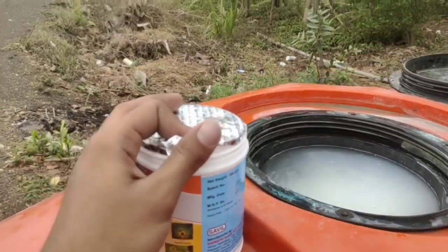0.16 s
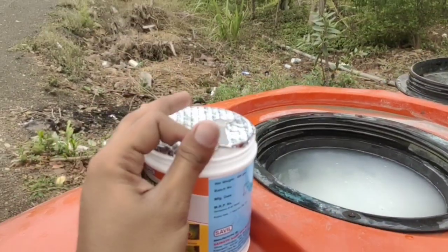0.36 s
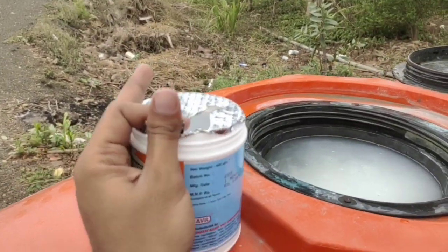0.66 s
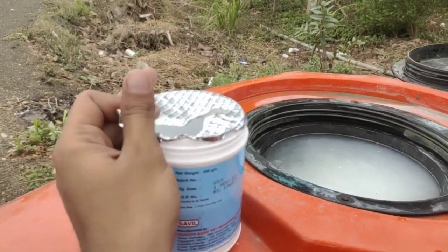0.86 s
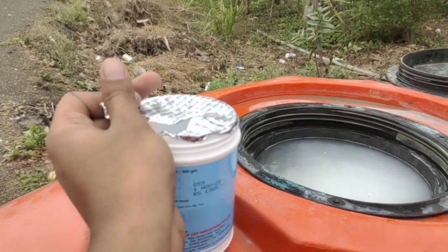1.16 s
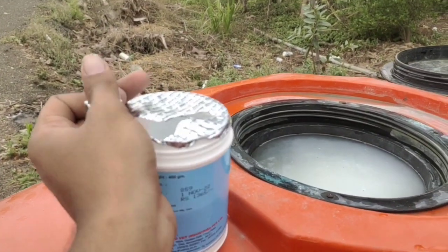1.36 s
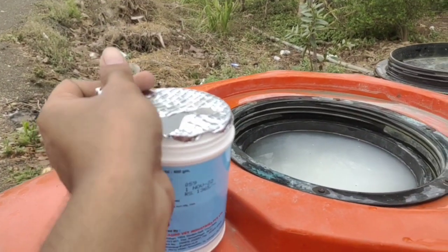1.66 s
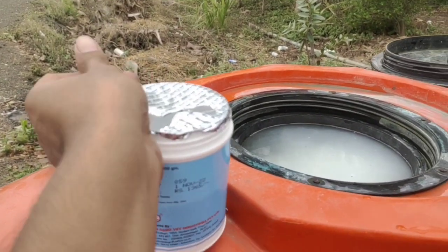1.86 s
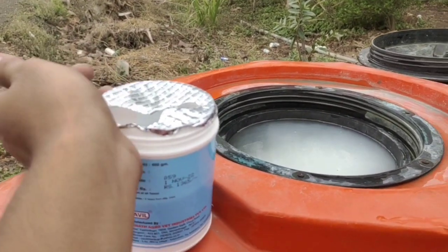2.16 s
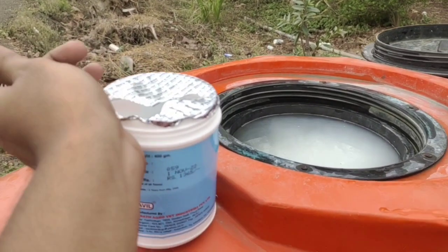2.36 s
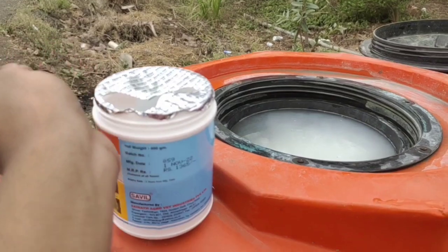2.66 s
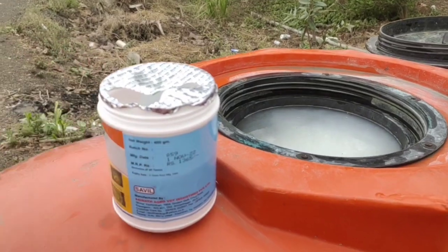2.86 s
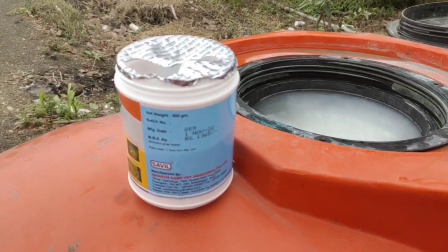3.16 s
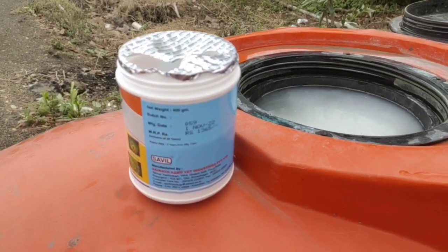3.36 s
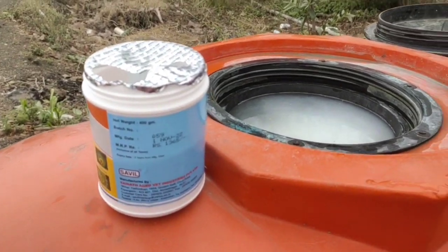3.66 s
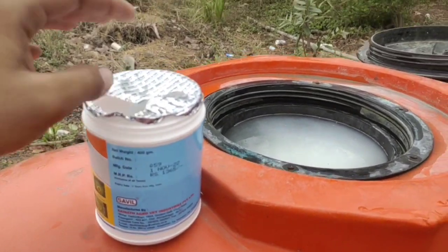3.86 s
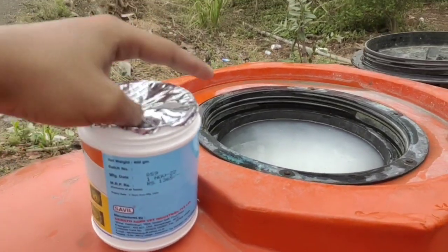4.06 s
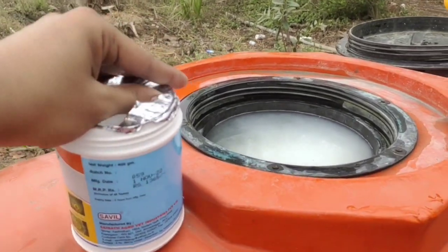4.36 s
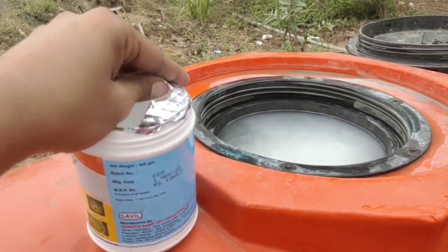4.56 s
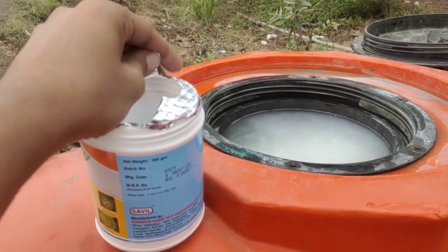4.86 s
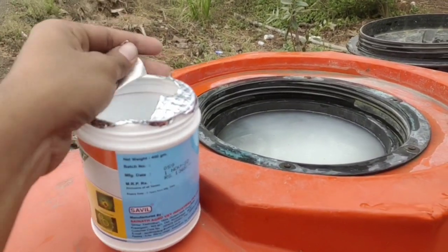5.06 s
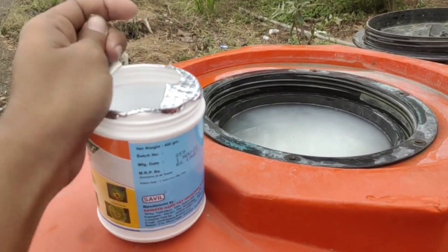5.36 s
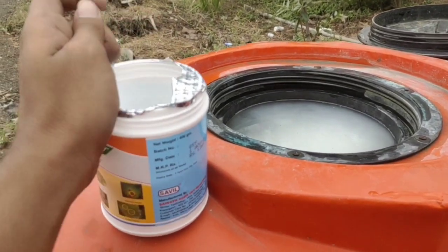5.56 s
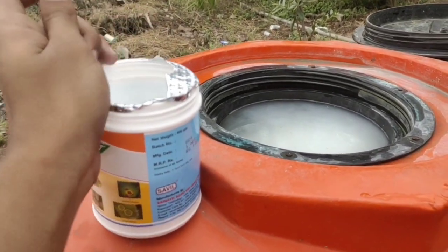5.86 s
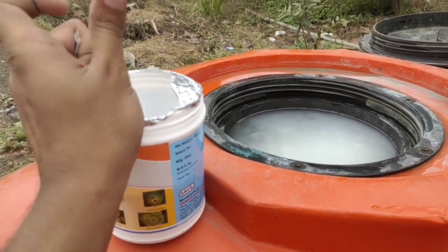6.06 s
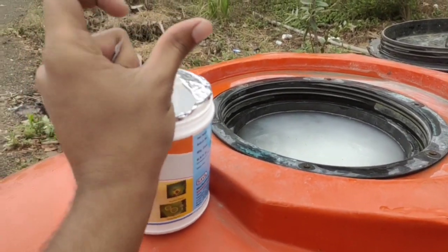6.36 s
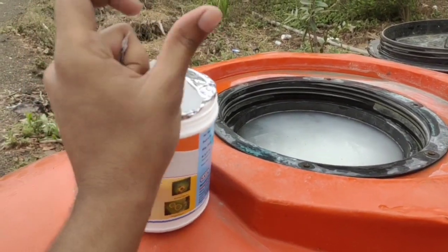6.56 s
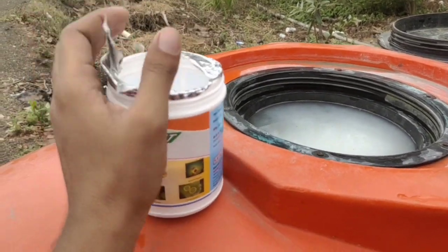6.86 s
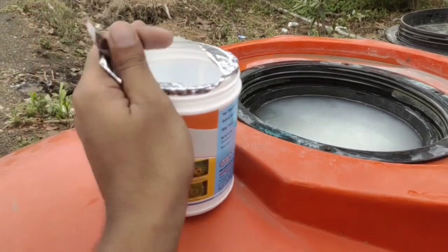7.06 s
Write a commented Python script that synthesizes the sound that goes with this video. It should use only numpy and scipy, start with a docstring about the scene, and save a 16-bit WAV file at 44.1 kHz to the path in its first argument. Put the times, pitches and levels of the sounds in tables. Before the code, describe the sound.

Fingers pick and snap the foil seal on a plastic jar outdoors, a loose cap clatters briefly, and a small bird repeats quick whistles.

```python
"""Outdoors, close to a plastic jar on a hollow plastic tank: fingers rub and pick at its foil seal from
the start. Foil snaps are struck rings with crackle, rips are runs of clicks, and bumps ring the tank's low modes.
A small bird soon repeats two falling whistles and a rough high note; other birds call farther off.
Halfway a loose cap clatters in a burst of ringing modes; then bird and picking go on, with a hard snap
and late rips. Shaped noise makes a faint hiss, the breeze's rumble and the open air throughout."""
import sys
import numpy as np
from scipy import signal
from scipy.fft import rfft, irfft, next_fast_len
from scipy.io import wavfile

SR = 44100
rng = np.random.default_rng(int(sys.argv[2]) if len(sys.argv) > 2 else 0)


def transcribe(u):
    """Save the signal u as a 16-bit wav file named by the first command-line argument.

    u: samples, shape (n,) or (channels, n), limited to [-1, 1]; the rate is SR.
    q: integer samples, one column per channel.
    """
    v = np.clip(np.atleast_2d(u).T, -1, 1)
    q = np.round(v * 32767).astype(np.int16)
    wavfile.write(sys.argv[1], SR, q)


N = 317961

# low modes of the hollow tank: (frequency [Hz], relative level [dB], t60 of the rubbed hum [s])
TANK_MODES = [(127, 4.5, 0.15), (251.8, 5.5, 1), (532, -3.5, 0.13)]
JAR_LAG_S, BIRD_LAG_S = 9 / 44100, 35 / 44100   # how much later the left port hears them


def amp(db):
    """dB to gain."""
    return 10 ** (np.asarray(db) / 20)


def rms_one(x):
    """Scale to rms 1."""
    return x / np.sqrt(np.mean(x ** 2) + 1e-20)


def in_time(rows):
    """Columns of a curve table, one value per sample."""
    s, *columns = np.transpose(rows)
    return [np.interp(np.arange(N) / SR, s, c) for c in columns]


def drift(rate):
    """A wandering curve: random knots of spread 1, `rate` of them per second, joined by lines."""
    knots = rng.standard_normal(int(N / SR * 60) + 2)
    return np.interp(np.arange(N) / SR * rate, np.arange(len(knots)), knots)


def band(x, low_hz, high_hz):
    """Butterworth band-pass."""
    return signal.sosfilt(signal.butter(2, [low_hz, high_hz], "band", fs=SR, output="sos"), x)


def coloured(x, spectrum):
    """Filter x by a curve in dB over log frequency; rms 1."""
    size = next_fast_len(N)
    hz, db = np.transpose(spectrum)
    bins_hz = np.arange(size // 2 + 1) * SR / size
    gain = amp(np.interp(np.log(bins_hz + 1), np.log(hz), db, left=-80, right=-80))
    return rms_one(irfft(rfft(x, size) * gain, size)[..., :N])


def ring(push, hz, t60):
    """A resonator: a unit click sets a dying sine of starting height 1 ringing."""
    r, w = amp(-60 / (t60 * SR)), 2 * np.pi * hz / SR
    return signal.lfilter([0, np.sin(w)], [1, -2 * r * np.cos(w), r * r], push + 1e-18)


def add(out, s, sound, pan_db=0):
    """Mix a short sound (one or two channels) in at time s; positive pan leans left."""
    i = max(round(s * SR), 0)
    panned = sound * amp([[pan_db / 2], [-pan_db / 2]])
    out[:, i:i + sound.shape[-1]] += panned[:, :N - i]


def at_ports(x, lag_s):
    """The left microphone port hears the sound later than the right."""
    lag = round(lag_s * SR)
    return np.stack([np.r_[np.zeros(lag), x[0, :N - lag]], x[1]])


def grains(per_s, spread_db, alike):
    """Two channels of random clicks of uneven size, partly shared between the channels."""
    sizes = amp(spread_db * np.minimum(rng.exponential(1, (3, N)), 5)) * rng.choice([-1, 1], (3, N))
    clicks = rms_one(sizes * (rng.random((3, N)) < per_s / SR))
    return np.sqrt(alike) * clicks[0] + np.sqrt(1 - alike) * clicks[1:]


def crack(noise, t60, low_hz, high_hz=16000):
    """A burst of band-passed noise that rises in a moment and dies fast."""
    rise_s = 0.0012
    age = np.arange(noise.shape[-1]) / SR
    return rms_one(band(noise, low_hz, high_hz)) * amp(-60 * age / t60) * np.minimum(age / rise_s, 1)


def patchy(x, low_hz, depth_db):
    """Split into half octaves that each flicker quickly on their own."""
    edges = low_hz * 2 ** np.arange(0, 4.1, .5)
    return sum(band(x, .92 * low, 1.08 * high) * amp(depth_db * drift(55))
               for low, high in zip(edges, edges[1:]))


def jar_mouth(x):
    """The open jar lifts a few broad resonances out of any foil sound."""
    # resonances of the mouth: (frequency [Hz], width [Hz], level [dB])
    resonances = [(2450, 380, 13), (4050, 500, 8), (5750, 700, 7)]
    out = x
    for hz, width, db in resonances:
        r = np.exp(-np.pi * width / SR)
        poles = [2, -4 * r * np.cos(2 * np.pi * hz / SR), 2 * r * r]
        out = out + amp(db) * signal.lfilter([1 - r * r, 0, r * r - 1], poles, x)
    return out


def whistle(length, from_hz, to_hz, rough):
    """A gliding near-sine with a soft start and end; roughness is quick level flutter."""
    share = np.arange(round(length * SR)) / (length * SR)
    tone = np.sin(2 * np.pi * np.cumsum(from_hz + (to_hz - from_hz) * share ** 0.72) / SR)
    flutter = np.interp(share * length * 400, np.arange(100), rng.standard_normal(100))
    return tone * (1 + rough * flutter) * np.sin(np.pi * share) ** 0.19


def scrub_echo(x, t60):
    """Diffuse echo from the bushes, unrelated in the two channels: convolution with dying noise."""
    age = np.arange(SR // 2) / SR
    echo = rng.standard_normal((2, len(age))) * amp(-60 * age / t60) * np.minimum(age / 0.011, 1)
    return signal.fftconvolve(x.mean(0)[None], echo, axes=1)[:, :N]


def snaps():
    """Each dimple flips: a ragged push rings its own pitch and thuds around it, creases crackle on top."""
    # foil dimples popping: (time [s], ring peak [dB], ring pitch [Hz], cycles rung to -60 dB,
    # relative mid crackle level [dB], relative bright crack level [dB])
    dimples = [(0.148, -52, 890, 18, -32.5, -34), (0.179, -34.5, 5500, 20, -33, -48),
               (0.414, -67, 1960, 42, -57, -46.5), (0.538, -52.5, 840, 10, -68, -72),
               (0.799, -56, 894, 20, -35.5, -40.5), (0.81, -41.5, 850, 20, -23.5, -25.5),
               (0.896, -45, 2030, 44, -53, -60), (1.034, -54.5, 670, 28, -70, -77),
               (1.463, -43, 603, 8.2, -42, -56), (1.754, -48.5, 2400, 24, -39.5, -85),
               (1.814, -37.5, 912, 51, -36.5, -48), (1.8306, -28.5, 1250, 60, -25.5, -40),
               (2.793, -43, 2480, 47, -35, -47), (3.008, -67, 5500, 35, -64, -57),
               (3.073, -78, 583, 17, -55, -58.5), (4.28, -23, 890, 21.7, -28.5, -59),
               (4.462, -33, 850, 7, -55, -70), (4.505, -50, 412, 17, -43, -62),
               (4.614, -52.5, 683, 16, -73, -80), (4.733, -35, 2440, 64, -37, -69),
               (4.743, -45.5, 587, 4, -62, -78), (4.754, -53, 590, 6.7, -50, -75),
               (4.8226, -17, 934, 5.6, -13, -20.5), (5.263, -41.5, 2690, 42, -35.5, -78),
               (5.629, -40, 2530, 29, -29, -60.5), (5.637, -33, 2500, 22, -37, -59),
               (5.802, -74, 2140, 34, -35.5, -48.5), (5.864, -79, 3300, 30, -33.5, -40),
               (5.878, -59, 2550, 30, -35.5, -49), (5.975, -49, 2050, 44, -37, -58),
               (6.09, -43, 1970, 47, -75, -83), (6.159, -29.5, 3150, 7.7, -49, -74),
               (6.189, -46, 2480, 30, -40, -45), (6.306, -40, 1960, 43, -67, -86),
               (6.668, -49, 2340, 30, -55, -73), (6.703, -45, 2400, 27, -37.5, -58),
               (6.755, -73, 2400, 24, -38.5, -58), (6.779, -47, 2400, 30, -33, -60),
               (6.796, -35, 2540, 17, -18, -26.5), (6.857, -39.5, 2450, 27, -36, -66),
               (6.929, -38.5, 2300, 60, -55, -38)]
    thud_t60, crackle_t60 = 1.26 * 0.043, .016   # [s]
    thud_db, thud_db_per_octave = -9.5, -7   # thud against ring at 800 Hz; low dimples thud more
    out, size = np.zeros((2, N)), 4000
    age = np.arange(size) / SR
    unevenness = amp(2.28 * rng.exponential(1, (len(dimples), 1, size)))
    noise = rng.standard_normal((len(dimples), 3, size)) * unevenness
    noise[:, 0, 20] = 3.9     # the flip itself is one sharp click
    for (s, ring_db, hz, cycles, mid_db, bright_db), n in zip(dimples, noise):
        both, octaves = n[0] + 0.49 * n[1:], np.log2(hz / 800)
        t60 = cycles / hz
        push = n[0] * amp(-60 * age / (.2 * t60))
        tone = band(ring(push, hz, t60), .6 * hz, 1.8 * hz)
        tone = tone * np.minimum(age / (3 / hz), 1)   # builds over three cycles
        thud = crack(n[0] + 6.2 * n[1:], thud_t60, low_hz=0.22 * hz, high_hz=2.07 * hz)
        thud = amp(thud_db + thud_db_per_octave * octaves) * thud
        add(out, s, amp(ring_db) * (tone / np.abs(tone).max() + thud), pan_db=9.3 * octaves)
        # a short crackle with a longer, weaker tail, its channels swapped
        mid, bright = (crack(both, crackle_t60 / 2, *edges)
                       + amp(-8.5) * crack(both[::-1], 1.52 * crackle_t60, *edges)
                       for edges in [(1900, 4880), (6700, 15400)])
        add(out, s, amp(mid_db - 13) * jar_mouth(mid), pan_db=3.5)
        add(out, s, amp(bright_db) * bright, pan_db=-10.0)
    return out


def rips():
    """Glue lets go in a dense uneven run of clicks that swells and stops."""
    # short rips: (start [s], length [s], relative mid level [dB], relative bright level [dB])
    tears = [(0.042, 0.032, -60, -48), (1.817, 0.062, -47.5, -56), (4.84, 0.017, -35, -42),
             (6.766, 0.034, -48, -49), (6.793, 0.016, -43.5, -35.5), (6.896, 0.034, -57.5, -60),
             (6.925, 0.017, -46.5, -45)]
    out, clicks = np.zeros((2, N)), grains(9000, spread_db=2.5, alike=.6)
    mid = rms_one(jar_mouth(band(clicks, 1700, 4700)))
    bright = rms_one(band(clicks, 8300, 19845))
    for s, length, mid_db, bright_db in tears:
        i, size = round(s * SR), round(length * SR)
        swell = np.sin(np.pi * np.linspace(0, 1, size) ** 0.44)
        clicking = amp(mid_db) * mid[:, i:i + size] + amp(bright_db) * bright[:, i:i + size]
        add(out, s, swell * clicking, pan_db=5.0)
    return out


def finger_strokes():
    """Foil rustle is dense tiny creases, the rub through the jar wall is coarser; both fade along a stroke."""
    # strokes over the foil: (start [s], length [s], starting rustle level [dB], starting rub level [dB])
    strokes = [(0, 0.035, -51.5, -57.5), (0.037, 0.25, -60, -61), (0.39, 0.13, -66, -79.5),
               (0.624, 0.1, -64, -64.5), (0.782, 0.037, -45, -46.5), (0.794, 0.47, -60.5, -58.5),
               (1.432, 0.31, -66, -62), (1.785, 0.068, -51.5, -43.5), (1.866, 0.11, -54.5, -60.5),
               (2.007, 0.16, -65, -69), (2.783, 0.087, -62.5, -79), (4.163, 0.26, -56, -56.5),
               (4.306, 0.11, -55.5, -55), (4.433, 0.28, -72.5, -65.5), (4.508, 0.057, -61.5, -54.5),
               (4.687, 0.44, -68, -65), (4.81, 0.07, -45, -46), (5.012, 0.26, -65, -86),
               (5.246, 0.2, -58, -70.5), (5.622, .12, -59.5, -62), (5.819, 0.2, -60, -68.5),
               (6.061, 0.16, -66.5, -60), (6.146, 0.29, -62, -62), (6.732, 0.083, -49.5, -47.5),
               (6.796, 0.21, -56, -61), (7.096, 0.19, -52.5, -58)]
    # spectra at the microphone: (frequency [Hz], relative density [dB per Hz])
    rustle_spectrum = [(650, -42.5), (1100, -30.5), (1740, -20), (1990, -12), (2640, 3.5), (6600, -7.5),
                       (7220, -8), (14800, -8), (16000, -36)]
    rub_spectrum = [(150, -0.5), (300, -1), (800, 1.5), (1300, -7), (2200, -8)]
    rustle_fade_db, rub_fade_db = 14, 16.5   # loss from start to end of a stroke
    release_s, crinkle_db, tank_hum_db = 0.016, 1, -14   # crinkle: unevenness within a stroke
    gains = np.zeros((2, N))
    for start, length, rustle_db, rub_db in strokes:
        share = np.linspace(0, 1, round(length * SR))
        add(gains, start, amp([rustle_db - rustle_fade_db * share, rub_db - rub_fade_db * share]))
    keep = np.exp(-1 / (release_s * SR))   # fingers land and lift softly
    gains = signal.lfilter([1 - keep], [1, -keep], gains)
    rustle_gain, rub_gain = gains * amp(crinkle_db * np.stack([drift(25), drift(25)]))
    creases = patchy(grains(4000, spread_db=4.0, alike=.3), low_hz=1050, depth_db=3.0)
    rustle = coloured(creases, rustle_spectrum)
    rustle = rms_one(rustle + amp(-13.5) * jar_mouth(rustle))
    scrapes = patchy(grains(2000, spread_db=2.5, alike=.92), low_hz=160.0, depth_db=1.5)
    rub = coloured(scrapes, rub_spectrum)
    # the rub sets the tank humming
    hum = rms_one(sum(amp(db) * ring(rub[0], hz, t60) for hz, db, t60 in TANK_MODES))
    return rustle * rustle_gain + (rub + amp(tank_hum_db) * hum) * rub_gain


def bumps():
    """The jar bumps the tank: a contact strikes the tank's low modes, a harder one lifts the upper modes."""
    # contacts: (time [s], relative level [dB], hardness as lift of the modes above the lowest [dB])
    contacts = [(0.672, -66, 17.5), (0.796, -51.5, 17), (0.822, -29.5, 2), (0.929, -45.5, -1.5),
                (1.15, -52.5, 10.5), (1.468, -40, 7.5), (1.797, -57, 3), (1.828, -44.5, 16.5),
                (2.023, -41, 0.5), (2.102, -49.5, 1.5), (2.336, -44.5, -14.5), (4.045, -37.5, -46),
                (4.208, -42.5, -6), (4.357, -36.5, 1), (4.516, -50.5, 4), (4.824, -26, 4),
                (5.232, -40.5, -9.5), (6.181, -40.5, -7.5), (6.743, -29.5, -0.5), (6.828, -37, -4),
                (7.031, -39, -12), (7.13, -39, -4.5)]
    rows, out = np.array(contacts), 0
    at = (rows[:, 0] * SR).astype(int)
    spread = rng.normal(0, 2, (len(rows), len(TANK_MODES)))
    for k, (hz, level_db, _) in enumerate(TANK_MODES):
        clicks = np.zeros(N)
        clicks[at] = amp(rows[:, 1] + level_db - 13.0 + spread[:, k] + rows[:, 2] * (k > 0))
        out = out + ring(clicks, hz, 15 / hz)   # thick plastic rings few cycles
    out = band(out, 85, 2000)   # the bumps keep to 85 Hz to 2 kHz
    return np.stack([out, out * amp(1.0)])


def cap():
    """Each bounce strikes every mode of the loose cap anew, with a crack and a short scatter."""
    # bounces: (time [s], relative ring peak [dB], relative crack level [dB], lift of the two main modes [dB])
    bounces = [(3.54, -34, -46.5, -5.5), (3.56, -21, -26.5, -4), (3.565, -18, -54, -1.5),
               (3.61, -32.5, -43.5, 1.5), (3.631, -18, -31, -12), (3.648, -34, -38, -3),
               (3.653, -27, -37, -6.5)]
    # modes of the cap: (frequency [Hz], relative level [dB], t60 before a limit of 0.045 s [s])
    cap_modes = [(950, -6.5, 0.037), (1330, -2, 0.0099), (2090, -1.5, 0.082), (2437, 2, .046),
                 (3060, -7, 0.04), (3800, -16, 0.0444), (3950, -9.5, 0.029), (4980, -11, 0.022),
                 (5700, -23.5, 0.025)]
    out, size = np.zeros((2, N)), 6000
    noise = rng.standard_normal((len(bounces), 2, size))
    spread = rng.normal(0, 3, (len(bounces), len(cap_modes)))
    for (s, peak_db, crack_db, lift_db), n, own in zip(bounces, noise, spread):
        push = n * amp(-60 * np.arange(size) / SR / .004)     # the rim rattles for a few ms
        push = push[0] + .4 * push
        modes = 0
        for (hz, db, t60), own_db in zip(cap_modes, own):
            level_db = db + own_db + lift_db * (1900 < hz < 2600)
            modes = modes + amp(level_db) * ring(push, hz, min(t60, .045))
        modes = band(band(modes, 900, 9000), 850, 10300)
        scatter = crack(n, 0.014, low_hz=6200)
        scatter = scatter + amp(-3.5) * crack(n, 0.034, low_hz=1995, high_hz=6700)
        scatter = scatter + amp(-30) * crack(n[::-1], 0.33, low_hz=900, high_hz=5200)
        ringing = amp(peak_db + 0.5) * modes / np.abs(modes).max()
        add(out, s, ringing + amp(crack_db + 8.0) * scatter, pan_db=1.5)
    return out


def near_bird():
    """Two falling whistles and a high rough note per phrase; the whistles' pitch varies by phrase."""
    # phrases: (time [s], whistle reference level [dB])
    phrases = [(0.337, -70.5), (0.595, -72.5), (0.854, -69), (1.115, -65), (1.392, -68), (1.66, -65),
               (1.93, -66.5), (2.206, -66.5), (2.483, -64), (2.758, -64.5), (4.118, -71.5), (4.38, -66),
               (4.641, -66), (4.892, -67), (5.156, -70.5), (5.428, -71.5), (5.697, -65.5), (5.972, -67.5),
               (6.243, -65.5), (6.54, -70)]
    # whistles: (start in phrase [s], length [s], from [Hz], to [Hz], level over the reference [dB]);
    # each phrase bends their pitch by a percent or so
    sweeps = [(0, 0.02, 4782, 3612, 8), (0.024, 0.02, 4264, 3936, 12.5)]
    # rough note: (start in phrase [s], length [s], from [Hz], to [Hz])
    buzz = (.07, .06, 6420, 6560)
    first_buzz_db, second_buzz_db, second_bout_s = -66.5, -71, 3.5   # fainter in the second bout
    out = np.zeros((2, N))
    start, length, from_hz, to_hz = buzz
    bends = 1 + 0.013 * rng.standard_normal(len(phrases))
    for (s, sweep_db), bend in zip(phrases, bends):
        buzz_db = first_buzz_db if s < second_bout_s else second_buzz_db
        add(out, s + start, amp(buzz_db) * whistle(length, from_hz, to_hz, rough=.8), pan_db=7.5)
        for begin, last, top_hz, end_hz, db in sweeps:
            note = whistle(last, top_hz * bend, end_hz * bend, rough=0.4)
            add(out, s + begin, amp(sweep_db + db) * note, pan_db=8.5)
    return at_ports(out, BIRD_LAG_S) + amp(-37) * scrub_echo(out, t60=.33)


def far_calls():
    """The clearest distant calls and faint notes: gliding whistles with echo."""
    # calls: (time [s], length [s], from [Hz], to [Hz], level before panning and echo [dB])
    calls = [(1.969, 0.05, 923, 917, -71), (3.8, .07, 5050, 6600, -80), (2.323, 0.046, 2390, 2500, -76.5),
             (2.377, 0.012, 2350, 2300, -68), (2.501, 0.091, 6150, 6540, -69),
             (4.172, 0.015, 1500, 1460, -63), (2.701, 0.052, 2235, 2600, -69),
             (2.879, 0.034, 2200, 2470, -71), (3.237, 0.12, 7400, 6000, -79),
             (3.738, 0.035, 2640, 2534, -66), (3.831, 0.0095, 2510, 2100, -68),
             (4.16, 0.031, 2790, 2640, -62.5)]
    out = np.zeros((2, N))
    for s, length, from_hz, to_hz, db in calls:
        add(out, s, amp(db) * whistle(length, from_hz, to_hz, rough=.5), pan_db=12)
    return at_ports(out, BIRD_LAG_S) + amp(-38) * scrub_echo(out, t60=.3)


def rasps():
    """A wide raspy call swells in the bushes: band-passed noise under a rounded envelope."""
    # calls: (start [s], length [s], level before envelope and panning [dB])
    raspy_calls = [(2.189, 0.14, -72), (2.459, 0.49, -68), (2.773, 0.24, -72.5), (5.685, 0.14, -62.5),
                   (6.012, 0.093, -67)]
    out = np.zeros((2, N))
    for s, length, db in raspy_calls:
        noise = rng.standard_normal((2, round(length * SR)))
        rasp = rms_one(band(band(noise, 4600, 6500), 4400, 6800))
        swell = np.sin(np.pi * np.linspace(0, 1, rasp.shape[1]) ** 0.22)
        add(out, s, amp(db) * rasp * swell, pan_db=6.0)
    return out


def hiss_and_chorus():
    """A faint hiss band of flickering noise, and a chirping chorus of many echoed whistles over a noise wash."""
    # faint hiss band and chirping chorus: (time [s], relative hiss level [dB], relative chorus level [dB])
    levels = [(0.0, -90, -62.5), (0.46, -87.5, -85.5), (0.94, -65.5, -71.5), (1.26, -80.5, -76),
              (1.95, -76, -75.5), (2.35, -84, -76), (2.95, -79, -79), (3.59, -98, -94),
              (3.67, -62.5, -89.5), (3.95, -86, -86), (4.34, -72, -69.5), (4.56, -84.5, -80.5),
              (5.26, -68.5, -77), (5.72, -79, -70), (6.2, -62, -67.5), (6.49, -84.5, -79),
              (6.8, -62.5, -81.5), (7.21, -102.5, -76)]
    crowd = np.zeros((2, N))
    for when, pitch, fall, size in rng.random((500, 4)):
        hz = 4300 + 2500 * pitch
        chirp = whistle(.04, hz, hz * (1.05 - .25 * fall), rough=.5)
        add(crowd, when * N / SR, amp(8 * size) * chirp)
    hiss_db, chorus_db = in_time(levels)
    hiss = rms_one(band(band(rng.standard_normal((2, N)), 2050, 2800), 1900, 2950))
    hiss = hiss * amp(2.5 * drift(30) + 3 * drift(7))
    wash = rms_one(band(band(rng.standard_normal((2, N)), 3500, 6500), 3300, 6900)) * amp(3 * drift(9))
    chorus = wash + amp(-2) * rms_one(scrub_echo(crowd, t60=.2))
    return (hiss * amp(hiss_db) + chorus * amp(chorus_db)) * amp([[2.5], [-2.5]])


def breeze_rumble():
    """A light breeze as lumpy low noise: coloured grains whose level wanders, partly shared by the ports."""
    # breeze strength: (time [s], level before wander and side balance [dB])
    breeze = [(0.0, -78.5), (0.76, -78), (0.98, -71), (1.26, -79.5), (1.85, -77.5), (1.97, -67),
              (2.93, -78.5), (3.75, -70), (4.12, -62.5), (4.7, -73.5), (5.04, -64.5), (5.88, -74),
              (6.04, -71), (6.59, -78), (6.97, -64.5), (7.21, -69.5)]
    # rumble spectrum: (frequency [Hz], relative density [dB per Hz])
    rumble_spectrum = [(25, -11), (50, -2), (110, 4.5), (200, -14), (350, -21), (600, -32.5)]
    rumble = coloured(grains(3600, spread_db=0.5, alike=.55), rumble_spectrum)
    return rumble * amp(in_time(breeze)[0] + 3.86 * drift(40)) * amp([[-1.5], [1.5]])


def open_air():
    """Steady faint air: flickering half octaves of noise over a low band, coloured together."""
    # air spectrum: (frequency [Hz], relative density [dB per Hz])
    air_spectrum = [(120, -46.5), (200, -7.5), (1080, -13.5), (3900, -8.5), (7010, -40.5), (7680, -16),
                    (8270, -16), (10300, -19.5), (13600, -14.5), (16000, -22)]
    air_db = -76.5
    upper = patchy(rng.standard_normal((2, N)), low_hz=949, depth_db=1.5)
    lower = band(rng.standard_normal((2, N)), 100, 670)
    return amp(air_db + 0.5 * drift(5.2)) * coloured(upper + lower, air_spectrum)


def scene():
    """Jar, cap and breeze rumble reach the right port first; birds and air surround them, and a faint hiss band
    sounds along."""
    close = snaps() + rips() + finger_strokes() + bumps() + breeze_rumble()
    close = at_ports(close, JAR_LAG_S) + at_ports(cap(), 2 * JAR_LAG_S)
    around = near_bird() + far_calls() + rasps() + hiss_and_chorus()
    return close + around + open_air()


def record(dry):
    """The microphone drops the deep bass; the top is cut steeply."""
    lean = signal.sosfilt(signal.butter(2, 50, "high", fs=SR, output="sos"), dry)
    return signal.sosfilt(signal.cheby2(12, 70, 16640, fs=SR, output="sos"), lean)


dry = scene()
out = record(dry)
transcribe(out)
```